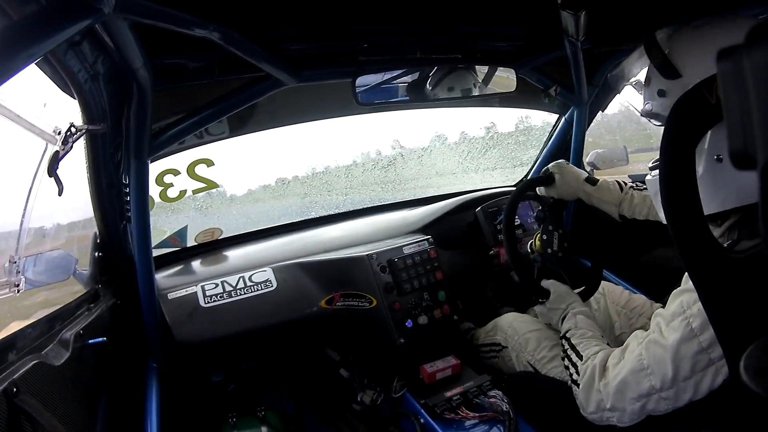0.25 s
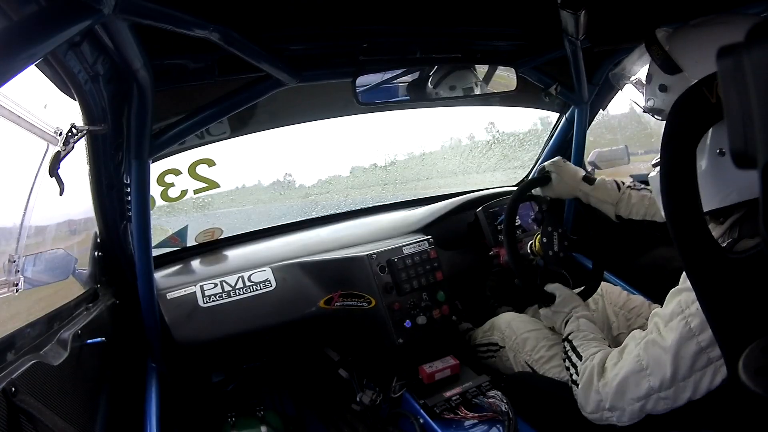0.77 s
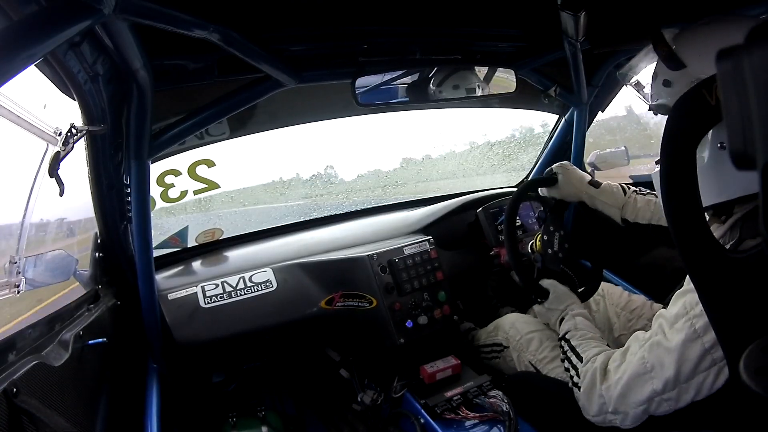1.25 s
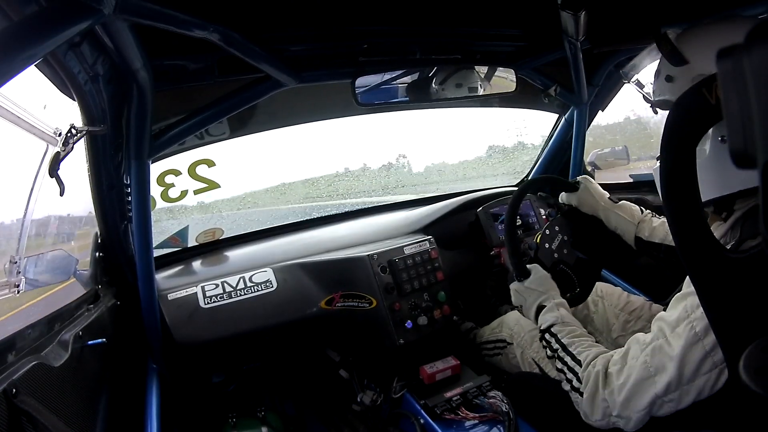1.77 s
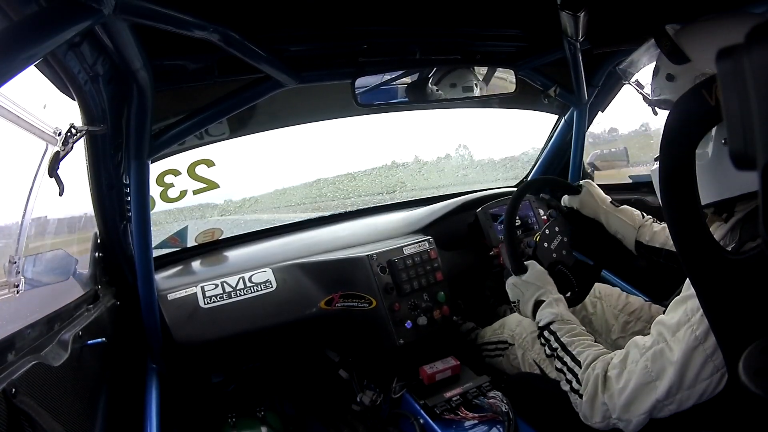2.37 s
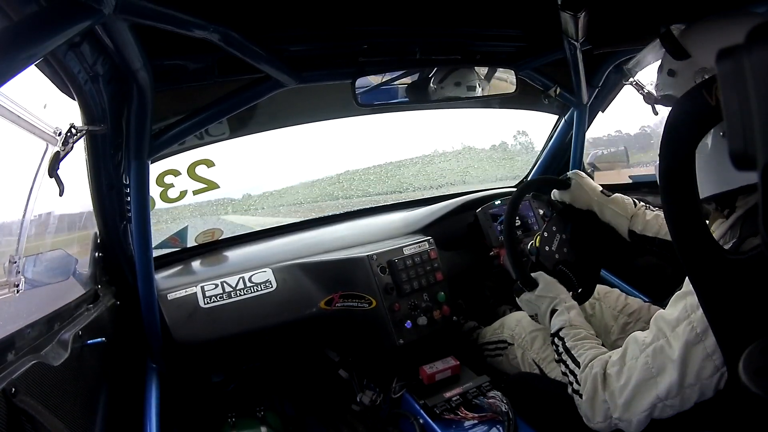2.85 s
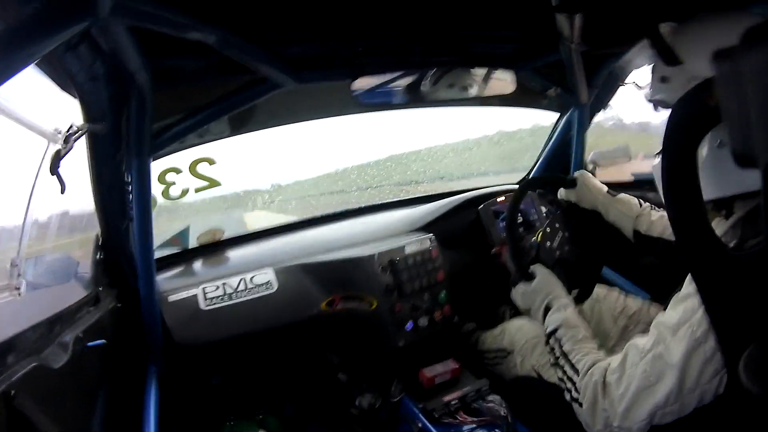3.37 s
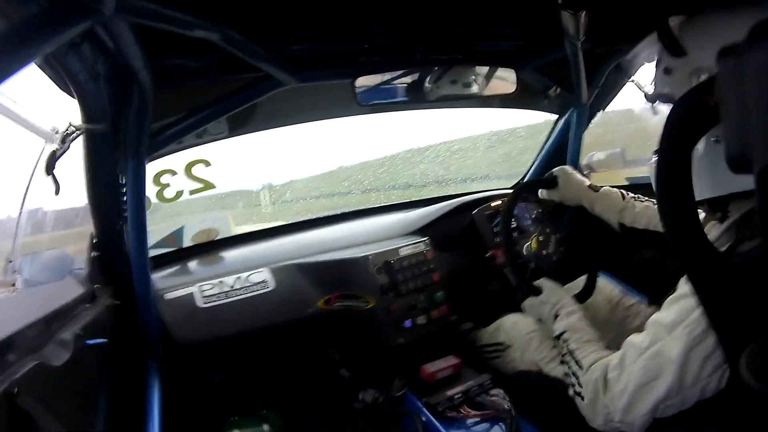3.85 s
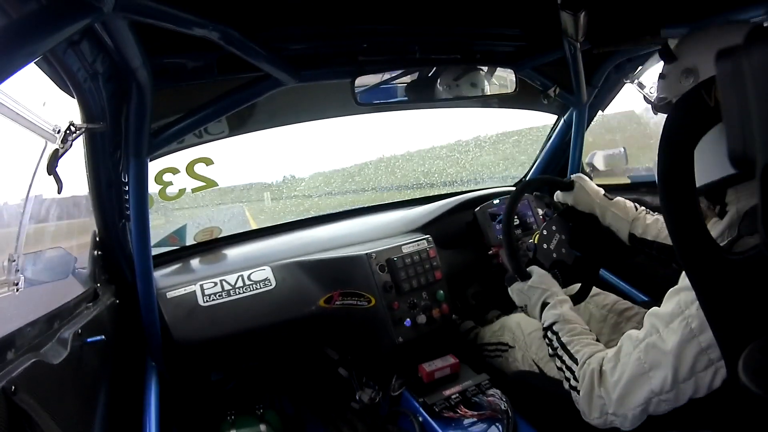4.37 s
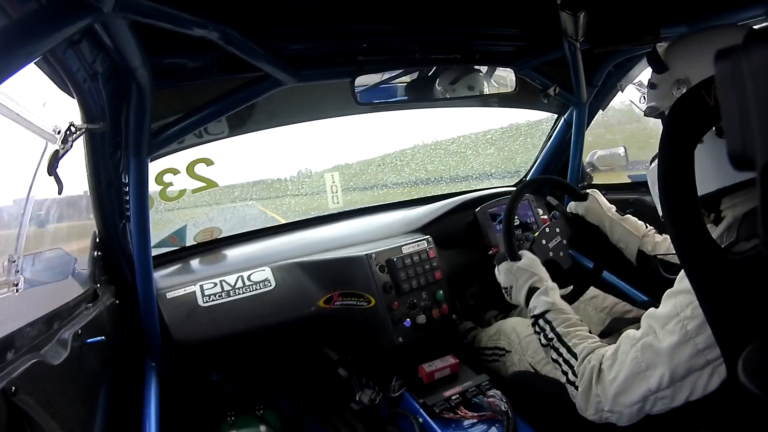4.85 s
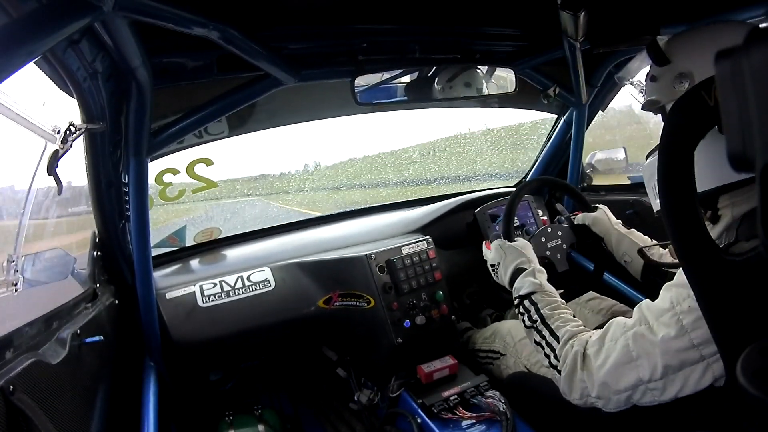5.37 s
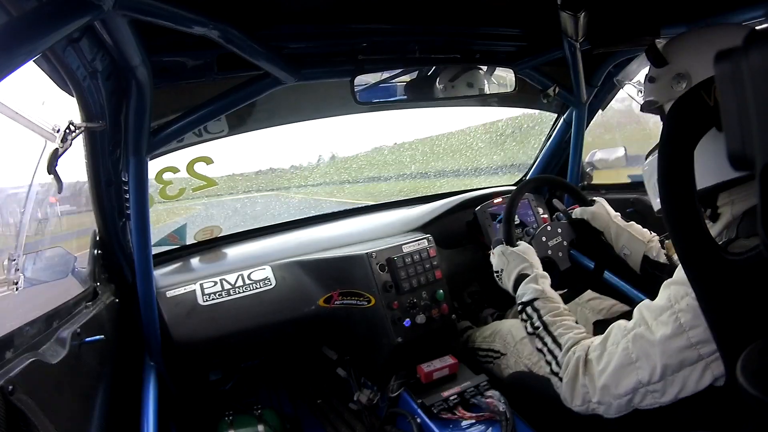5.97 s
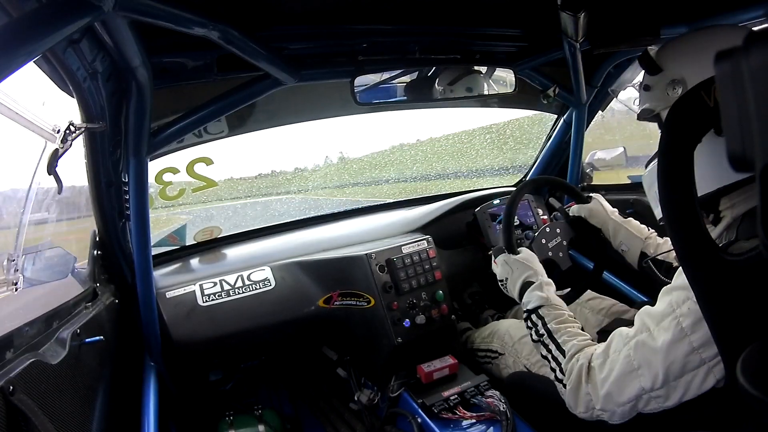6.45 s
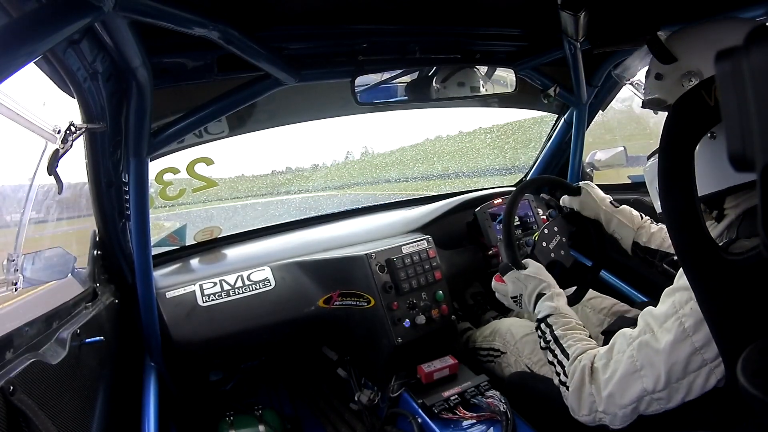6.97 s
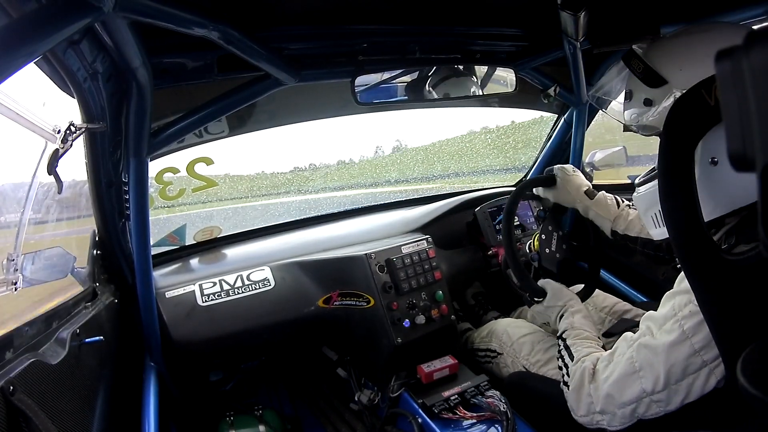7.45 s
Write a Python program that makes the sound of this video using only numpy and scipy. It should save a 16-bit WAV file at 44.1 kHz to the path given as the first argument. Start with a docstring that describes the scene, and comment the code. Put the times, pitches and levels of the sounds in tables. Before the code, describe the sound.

A microphone inside a stripped race car cabin catches a six-cylinder turbo engine. From 0 s it drones fairly muted, then by about 0.9 s boost builds into a loud, hard, resonant rasp that climbs slowly in one gear until 3.3 s, with little rev flutters over bumps, drive shaft hum and deep road rumble. From 3.2 to 4.8 s, strongest at 3.4-4.3, kerb ridges pound in rapid, buzzing low thuds with suspension knocks and high metal ticks, overloading the microphone and choking the engine. The throttle shuts around 4 s; one harsh snap cracks at 4.3. Under braking the dull, gassy coasting note sinks, interrupted by downshifts near 4.85, 5.4, 6.0 and 6.85 s, each jumping revs upward, with small barks and gearbox clatter. Brief whine follows the last two; the engine keeps slowing until 7.7 s.

```python
"""Race car over a kerb and down the gears

Inside the car a six-cylinder turbo engine pulls hard, hammers over a kerb, then brakes through four downshifts.
Engine: low-order sines, plus firing orders, clicks and gated gas noise coloured by exhaust and panels.
The drive shaft hums as two sines that follow road speed; the road rumbles as coloured noise.
Kerb ridges thud as phase-wavering sines; ticks and knocks are struck modes, clatter is bursts of grains.
The kerb overloads the microphone, which flattens big swings."""
import sys
import numpy as np
from scipy import signal
from scipy.fft import rfft, irfft, next_fast_len
from scipy.io import wavfile
from scipy.ndimage import uniform_filter1d

SR = 44100
rng = np.random.default_rng(int(sys.argv[2]) if len(sys.argv) > 2 else 0)


def attenuation_scalar(level_db):
    """Turn a level in dB into a linear amplitude multiplier (20 dB per decade)."""
    decades = np.asarray(level_db, float) / 20
    return 10 ** decades


def dump(signal):
    """Clip the signal to [-1, 1] and save it as 16-bit WAV at the path in sys.argv[1]."""
    limited = np.clip(np.atleast_2d(signal).T, -1, 1)
    pcm = np.round(limited * 32767).astype(np.int16)
    wavfile.write(sys.argv[1], SR, pcm)


N = 340444

# road speed as drive shaft turning speed: time_s, shaft_hz, hum_db
SPEED = [(0, 99.08, -47), (.47, 100.3, -32), (.84, 102.1, -28), (1.34, 104.5, -28.5), (1.83, 109.8, -29),
         (2.25, 113.8, -28.5), (2.55, 117.7, -23.5), (2.86, 120.2, -26.5), (3.3, 127.7, -29),
         (3.6, 130.3, -16), (3.95, 127.2, -21), (4.15, 128.4, -18), (4.27, 125.8, -14.5),
         (4.305, 124.8, -30), (4.36, 123.4, -8), (4.44, 122.8, -21), (4.68, 120, -22.5), (5.08, 106.5, -25),
         (5.4, 99.17, -39.5), (5.8, 94.78, -28.5), (6.0, 89.7, -33.5), (6.34, 81.72, -25.5),
         (6.7, 74.33, -49), (7.05, 69.23, -32), (7.15, 67.03, -50), (7.26, 66.83, -27.5),
         (7.38, 64.79, -50.5), (7.72, 61.53, -40)]
# cabin panel resonances: centre_hz, width_hz, lift_db
PANELS = [(537.7, 27.6, 10), (546, 35, -2), (600.7, 41, 8), (684, 30, 5), (726, 41, -0.5), (837, 11, 0),
          (891.4, 37, -4.5), (1015.7, 21, 4), (1157.3, 51, 5.5), (1306.9, 35.5, 10), (1345.6, 20, -6),
          (1415, 42.3, 8.5), (1591.5, 27, 6), (1950, 7.5, 0), (2096.5, 25, 4.5), (2542, 44, 4),
          (3370, 210, 4.5), (3724, 60, 6), (4152, 150, 6.5), (4464, 110, 9.5)]
# broad high panel resonances with the throttle shut: centre_hz, width_hz, lift_db
HIGH_PANELS_SHUT = [(3450, 200, 2.5), (4236, 260, 5), (4560, 120, 4.5)]


def curve(rows):
    """Interpolate each table column over time_s, sample by sample."""
    time_s, *columns = np.transpose(rows)
    return [np.interp(np.arange(N) / SR, time_s, column) for column in columns]


def ramp(start_s, takes_s):
    """Rise from 0 to 1 over a span."""
    return np.clip((np.arange(N) / SR - start_s) / takes_s, 0, 1)


def hump(peak_s, half_width_s):
    """Triangle up to 1 and down again."""
    return np.maximum(1 - abs(np.arange(N) / SR - peak_s) / half_width_s, 0)


def unit(x):
    """Scale to rms 1."""
    return x / np.sqrt(np.mean(x ** 2) + 1e-20)


def drift(rate_hz):
    """Slow random signal of rms 1: noise through a double pole, made at every 40th sample."""
    pole = np.exp(-80 * np.pi * rate_hz / SR)
    noise = rng.standard_normal(N // 40 + 2002)
    slow = signal.lfilter([1], [1, -2 * pole, pole * pole], noise)[2000:]
    return np.interp(np.arange(N) / 40, np.arange(len(slow)), unit(slow))


def colour(x, spectrum, panels=()):
    """Filter x by a gain curve over log frequency, lifted at the panel resonances."""
    size = next_fast_len(N + 4096)
    hz = np.arange(size // 2 + 1) * SR / size + 1e-3
    points_hz, points_db = np.transpose(spectrum)
    gain_db = np.interp(np.log(hz), np.log(points_hz), points_db, left=-120, right=-120)
    for centre_hz, width_hz, lift_db in panels:
        gain_db = gain_db + lift_db / (1 + (2 * (hz - centre_hz) / width_hz) ** 2)
    return irfft(rfft(x, size) * attenuation_scalar(gain_db), size)[:N]


def tone(turns, rms_db, waver_rad):
    """Sine of a given rms whose phase wavers slowly."""
    return np.sqrt(2) * attenuation_scalar(rms_db) * np.sin(2 * np.pi * turns + waver_rad * drift(6.03))


def ring(clicks, hz, t60_s):
    """Two-pole resonator: a unit click starts a decaying sine of height 1."""
    r, w = attenuation_scalar(-60 / (t60_s * SR)), 2 * np.pi * hz / SR
    return signal.lfilter([0, np.sin(w)], [1, -2 * r * np.cos(w), r * r], clicks + 1e-18)


def gearbox():
    """Engine speed is shaft speed times gear ratio, plus flares; also clutch-out and clutch-bite curves."""
    # clutch_out_s, take_up_s, engine_cycles_per_shaft_turn
    downshifts = [(4.84, 0.083, 0.5936), (5.4, 0.2182, 0.649), (6.0, .08, .77), (6.84, 0.0971, 0.972)]
    # revs flare as wheels slip over bumps or the clutch bites: peak_s, rise_cycles_hz, half_width_s
    flares = [(0.949, 2.37, 0.109), (1.251, 1.131, 0.0918), (1.59, 1.007, 0.0744), (1.748, 1.129, 0.0779),
              (2.78, 2.69, 0.0822), (3.203, 0.68, 0.072), (3.361, 3.06, 0.076), (3.749, 1.836, 0.138),
              (3.898, 2.688, 0.31), (4.932, 1.9, .12), (5.649, 1.988, 0.1099), (6.07, 5.05, 0.0738),
              (6.2, 2, 0.0897), (6.516, 2.627, 0.1487)]
    top_gear, bite_settles_s = .557, .18
    ratio, last_gear = top_gear, top_gear
    declutched, bite = np.zeros(N), np.zeros(N)
    for start_s, takes_s, gear in downshifts:
        ratio = ratio + (gear - last_gear) * ramp(start_s, takes_s)
        last_gear = gear
        declutched += hump(start_s + takes_s / 4, max(takes_s / 2, .05))
        bite += ramp(start_s + takes_s / 2, takes_s / 2) - ramp(start_s + takes_s, bite_settles_s)
    flare_hz = sum(rise_hz * hump(peak_s, half_s) for peak_s, rise_hz, half_s in flares)
    cycles_hz = curve(SPEED)[0] * ratio + flare_hz
    return cycles_hz, flare_hz, declutched, bite


def low_tones(cycles, cycles_hz, throttle, declutched, bite):
    """Sines of the crankshaft, one bank and all firings, boosted where the cabin booms."""
    # order_per_cycle, load_db, coast_db, clutch_out_change_db, waver_rad
    low_orders = [(2, -29.5, -31, 1, 0.42), (3, -28, -31, -18.5, 0.11), (6, -29, -56, 14, 0.53)]
    # swell of the first two tones while coasting: time_s, crankshaft_db, bank_db
    coast_swells = [(4.4, 1, 0), (5.0, 6.5, 1), (5.4, 1, 0), (5.7, -4.5, -2.5), (5.95, 1, 1),
                    (6.15, -1.5, 3.5), (6.5, -5, 1), (6.65, 4, -3.5), (6.85, 7, 1.5), (6.95, 0, 3.5),
                    (7.44, -2, 1.5), (7.52, -9.5, -6), (7.72, 5.5, -1.5)]
    # cabin boom: pitch_hz, gain_db
    boom = [(105, -15.5), (113, -4), (118, 1), (123, -4.5), (128, -13), (142, 1.5), (164, -3.5), (176, 0.5),
            (183, -2.5), (190, -2.5), (197, -2.5), (215, -2.5), (330, -2.5), (362, 2), (393, 4.5),
            (415, -1), (432, -12)]
    bite_db = 4.5
    out = np.zeros(N)
    for row, swell_db in zip(low_orders, [*curve(coast_swells), 0]):
        order, load_db, coast_db, clutch_out_db, waver_rad = row
        order = round(order)
        coasting_db = coast_db + swell_db
        level_db = coasting_db + throttle * (load_db - coasting_db)
        level_db = level_db + clutch_out_db * declutched + bite_db * bite
        level_db = level_db + np.interp(order * cycles_hz, *np.transpose(boom))
        out += tone(order * cycles + 3 / 4, level_db, waver_rad)
    return out


def gear_whine(cycles):
    """After the last two downshifts a sine at 24 per engine cycle swells and dies away."""
    # peak_s, peak_rms_db, rise_s, fall_10_db_s
    whines = [(6.17, -46.5, .04, 0.03), (7.07, -43, 0.052, 0.35)]
    out = np.zeros(N)
    for peak_s, peak_db, rise_s, fall_s in whines:
        since_s = np.maximum(np.arange(N) / SR - peak_s, 0)
        fading_db = peak_db - 10 * since_s / fall_s
        out += ramp(peak_s - rise_s, rise_s) * tone(24 * cycles, fading_db, waver_rad=.7)
    return out


def firings(cycles, throttle, jitter_gaps, spread_db):
    """One click per firing, sized and timed by its cylinder and split between two samples."""
    # cylinders in firing order: load_db, coast_db, late_firing_gaps
    cylinders = [(-13, 8.5, 0.0061), (-19, 15, 0.11), (-13, 9.5, -0.0466), (-8, 11.5, 0.0082),
                 (-2, 15.5, 0.1006), (-7, 12, -0.0222)]
    count = np.arange(1, int(6 * cycles[-1]) - 1)
    load_db, coast_db, late_gaps = np.transpose(cylinders)[:, count % 6]
    chance = rng.standard_normal((len(count), 2))
    at = np.interp(count + late_gaps + jitter_gaps * chance[:, 0], 6 * cycles, np.arange(N))
    first = np.minimum(at.astype(int), N - 2)
    size = attenuation_scalar(coast_db + throttle[first] * (load_db - coast_db) + spread_db * chance[:, 1])
    clicks = np.zeros(N)
    np.add.at(clicks, first, size * (1 - at % 1))
    np.add.at(clicks, first + 1, size * (at % 1))
    return unit(clicks - clicks.mean())


def orders(cycles, throttle, waver_turns, swell_db):
    """Repeating pressure wave of the cycle: orders share a timing waver, each swells on its own."""
    # orders of the four-stroke cycle, one row each from the fourth up: load_db, coast_db
    order_levels = [(-38.5, -24), (-27.5, -19.5), (-45.5, -24.5), (-30, -38.5), (-26, -24), (-21.5, -29),
                    (-32, -28), (-28, -30.5), (-17, -24), (-22, -33.5), (-21, -26.5), (-17, -30),
                    (-28.5, -36.5), (-32.5, -39.5), (-26, -35.5), (-31.5, -42), (-26.5, -26.5),
                    (-24.5, -37), (-29.5, -34), (-33.5, -39), (-55.5, -29), (-53.5, -31.5), (-28.5, -29.5),
                    (-30, -31.5)]
    # high orders that stand out of the rasp, rounded below: order_per_cycle, load_db
    rasp = [(28, -28), (29, -32), (32, -27.5), (33, -33), (34, -27), (35, -27.5), (37, -31.5), (39, -33),
            (40, -27.5), (41, -27.5), (44, -37), (46, -29.5), (47, -36), (48, -31), (42, -32), (51, -32),
            (54, -30), (57, -32), (60, -30.5), (62.96, -31.5), (65.86, -31.5), (68.77, -32.5), (72.13, -32),
            (75.03, -31.5), (77.83, -33)]
    # how loosely the orders gather into one suction pulse per cycle: time_s, scatter_turns
    punch_spread = [(0, .34), (.4, .3), (.55, .2), (1.0, .24), (1.2, .12), (1.55, .1), (1.75, .2),
                    (7.72, .18)]
    rasp_coast_change_db, waver_rad_per_order = -9, .014
    out, turns = np.zeros(N), cycles + waver_turns * drift(4.4)
    scatter_turns, = curve(punch_spread)
    rows = [(k, *levels_db) for k, levels_db in enumerate(order_levels, 4)]
    rows += [(round(k), load_db, load_db + rasp_coast_change_db) for k, load_db in rasp]
    for k, load_db, coast_db in rows:
        level_db = coast_db + throttle * (load_db - coast_db) + swell_db * drift(8.28)
        # orders above 30 waver more the higher they are
        rough_turns = waver_rad_per_order * max(k - 30, 0) * drift(30.) / (2 * np.pi)
        offset_turns = 3 / 4 + scatter_turns * rng.uniform(-1.484, 1)
        out += tone(k * turns + rough_turns + offset_turns, level_db, waver_rad=.582)
    return out


def gas_noise(cycles):
    """Exhaust gas as noise that throbs with the engine cycle and its first overtones."""
    # once-per-cycle throb: time_s, depth_0_to_1
    chug = [(0, 0), (1.0, 0.06), (1.2, 0.08), (1.55, 0.45), (1.8, 0), (3.3, 0), (4.2, 0.02)]
    depth = np.clip(curve(chug)[0], 0, 1)
    gate = 1 + depth * np.cos(2 * np.pi * (cycles - .1))
    gate = gate + .077 * np.cos(4 * np.pi * cycles) + .043 * np.cos(6 * np.pi * cycles)
    return unit(gate * attenuation_scalar(.19 * drift(25.)) * rng.standard_normal(N))


def engine():
    """Low tones and whine, plus pulses and gas noise coloured by the exhaust and the panels."""
    # before flares and barks: time_s, exhaust_drone_db, bright_bark_db
    load = [(0, -39, -39), (.13, -38.5, -39.5), (.72, -33.5, -33), (.88, -29, -29), (1.3, -28, -27),
            (1.8, -28, -24.5), (2.0, -34.5, -21.5), (2.32, -28.5, -23), (2.95, -29.5, -21),
            (3.27, -37, -21), (3.6, -30, -25), (3.95, -38.5, -28), (4.05, -31, -41.5), (4.3, -38, -42.5),
            (4.5, -40, -42.5), (5.4, -36.5, -45.5), (6.17, -36, -43.5), (6.75, -37.5, -47.5),
            (7.05, -34.5, -43), (7.72, -35, -46.5)]
    # short barks: peak_s, drone_lift_db, bark_lift_db, half_width_s
    blips = [(4.329, 3, 10.5, 0.019), (4.67, 3, 8, 0.0562), (5.46, 1, 7, .05), (6.06, 5.5, 4, 0.073),
             (6.825, 8.5, 6, 0.031), (6.9, 5.5, 7.5, 0.077)]
    # power share of pulses against gas noise, clutch in: time_s, share_0_to_1
    clean_share = [(0, .68), (.5, .75), (.9, .9), (3.26, .9), (3.4, .6), (3.95, .4), (4.15, .15),
                   (4.5, .35), (5.0, .4), (5.15, .62), (6.8, .62), (7.05, .78), (7.72, .78)]
    # drone colour, throttle shut then open: pitch_hz, gain_db
    drone_spectra = [
        [(140, -19.5), (230, -1.5), (442, -2), (528, -6.5), (745, -1), (824, -19.5), (950, -11.5),
         (1240, -34.5), (2090, -120)],
        [(140, -33.5), (230, -1), (338, -10), (381, -2), (450, -5.5), (544, -7.5), (950, -17), (1240, -21),
         (2090, -120)],
    ]
    # bark colour, throttle shut then open: pitch_hz, gain_db
    bark_spectra = [
        [(500, -34.5), (850, -0.5), (1180, -6), (1450, -1), (3080, -16), (4330, -17.5), (5800, -24),
         (8050, -29.5), (11300, -55.5), (12600, -60.5), (15500, -74)],
        [(500, -42), (850, -16), (1010, -13.5), (1100, -16), (1330, -3.5), (1520, -6), (1990, -13), (3930, -12),
         (4380, -12), (5200, -12.5), (7200, -18), (8050, -18.5), (8600, -29), (10000, -36), (15500, -47.5)],
    ]
    drone_flare_db_per_hz, clean_declutched = .47, .15
    boost_at_first, boost_from_s, boost_builds_s = .157, .15, .702
    ease_from_s, ease_takes_s, ease_share = 2.877, .542, .526

    cycles_hz, flare_hz, declutched, bite = gearbox()
    cycles = np.cumsum(cycles_hz) / SR
    throttle = 1 - ramp(3.95, .2)
    drone_db, bark_db = curve(load)
    drone_db = drone_db + drone_flare_db_per_hz * flare_hz
    for peak_s, drone_lift_db, bark_lift_db, half_s in blips:
        drone_db = drone_db + drone_lift_db * hump(peak_s, half_s)
        bark_db = bark_db + bark_lift_db * hump(peak_s, half_s)

    out = low_tones(cycles, cycles_hz, throttle, declutched, bite) + gear_whine(cycles)
    clicks = firings(cycles, throttle, jitter_gaps=.003, spread_db=.9)
    click_band = signal.butter(3, [1750, 5000], "band", fs=SR, output="sos")
    pulses = (.35 + .65 * throttle) * signal.sosfilt(click_band, clicks)
    pulses = pulses + orders(cycles, throttle, waver_turns=.0012, swell_db=1.6)
    clean = curve(clean_share)[0]
    clean = clean + declutched * (clean_declutched - clean)
    blow = np.sqrt(clean) * pulses + np.sqrt(1 - clean) * gas_noise(cycles)

    # boost builds, then the throttle is feathered over the kerb
    boost = throttle * (boost_at_first + (1 - boost_at_first) * ramp(boost_from_s, boost_builds_s))
    boost = boost * (1 - ease_share * ramp(ease_from_s, ease_takes_s))
    for (shut, wide), level_db in (drone_spectra, drone_db), (bark_spectra, bark_db):
        shut_part = unit(colour(blow, shut, PANELS[:15] + HIGH_PANELS_SHUT))
        wide_part = unit(colour(blow, wide, PANELS))
        part = (1 - boost) * shut_part + boost * wide_part
        # even out the running rms so level_db alone sets the loudness
        evened = part / np.sqrt(uniform_filter1d(part ** 2, size=8000) + 1e-20)
        out = out + attenuation_scalar(level_db) * evened
    return out


def shaft():
    """The drive shaft hums at its turning speed and the octave, throbbing under first braking."""
    throb_from_s, throb_to_s, throb_hz, throb_db, octave_db = 4.27, 4.82, 4.884, 4.5, -22.5
    shaft_hz, hum_db = curve(SPEED)
    braking = ramp(throb_from_s - .1, .062) - ramp(throb_to_s, .0759)
    throb = np.cos(2 * np.pi * throb_hz * (np.arange(N) / SR - throb_from_s))
    hum_db = hum_db + throb_db * braking * throb
    turns = np.cumsum(shaft_hz) / SR
    hum = tone(turns, hum_db + 2.08 * drift(4.2), waver_rad=.31)
    octave = tone(2 * turns, hum_db + octave_db + 4 * drift(6.7), waver_rad=.43)
    return hum + octave


def road():
    """Tyre and body rumble: coloured noise of drifting level."""
    # time_s, rumble_db
    road_level = [(0, -28), (.94, -30.5), (1.2, -27), (2.7, -25.5), (3.05, -21.5), (3.3, -21.5),
                  (3.45, -11), (3.85, -13.5), (4.6, -22.5), (4.8, -18), (5.05, -20.5), (5.4, -23.5),
                  (6.3, -24.5), (7.05, -26.5), (7.3, -26), (7.72, -29.5)]
    # pitch_hz, gain_db
    rumble_spectrum = [(12, -28), (20, 11.5), (60, 4), (113, 0), (150, -8), (184, -6.5), (252, -14),
                       (330, -18), (430, -29), (730, -120)]
    rumble = unit(colour(rng.standard_normal(N), rumble_spectrum))
    return attenuation_scalar(curve(road_level)[0] + 2.0 * drift(3.24)) * rumble


def kerb():
    """Uneven thuds, one per ridge; the body heaves below them and the suspension knocks above."""
    # strips of ridges under the wheels: start_s, end_s, ridge_hz, thud_db, fade_in_s
    strips = [(3.2, 3.556, 85.74, -10, 0.255), (3.6, 4.053, 64.91, -11, 0.11),
              (4.028, 4.317, 81.48, -18, 0.052), (4.324, 4.43, 81.28, -15.5, 0.037),
              (4.463, 4.768, 88.46, -24.5, .06)]
    fade_out_s = .0636
    level, hz = np.zeros(N), np.zeros(N)
    for start_s, end_s, ridge_hz, thud_db, fade_in_s in strips:
        level += attenuation_scalar(thud_db) * (ramp(start_s, fade_in_s) - ramp(end_s - fade_out_s, fade_out_s))
        hz[int(start_s * SR):] = ridge_hz
    phase = 2 * np.pi * np.cumsum(hz) / SR + .464 * drift(8.3)
    wave = np.sin(phase) + .179 * np.sin(2 * phase + drift(26.0))
    thuds = np.sqrt(2) * attenuation_scalar(2.585 * drift(45.)) * wave
    heave_band = signal.butter(2, [15, 50], "band", fs=SR, output="sos")
    heave = unit(signal.sosfilt(heave_band, rng.standard_normal(N)))
    # random blows, about 110 per second
    blows = rng.standard_normal(N) * (rng.random(N) < 110 / SR) + 1e-18
    knock_band = signal.butter(2, [150, 400], "band", fs=SR, output="sos")
    knocks = unit(signal.sosfilt(knock_band, blows))
    return level * (thuds + .261 * heave + .207 * knocks)


def strike(events, modes, soft_hz):
    """Blows ring a part's short modes with random strengths; soft contact dulls them by a low-pass."""
    at_s, blow_db = np.transpose(events)
    out, chance = np.zeros(N), rng.standard_normal((len(at_s), len(modes)))
    for (mode_hz, mode_db, t60_s), own in zip(modes, chance.T):
        clicks = np.zeros(N)
        clicks[(at_s * SR).astype(int)] = attenuation_scalar(blow_db + mode_db + 2.0 * own)
        out += ring(clicks, mode_hz, t60_s)
    return signal.sosfilt(signal.butter(2, soft_hz, fs=SR, output="sos"), out)


def suspension_knocks():
    """The suspension bottoms out on the kerb and rings low modes."""
    # start_s, blow_db
    knock_events = [(3.446, -12), (3.508, -24.5), (3.532, -18.5), (3.612, -25.5), (3.675, -17),
                    (3.752, -25.5), (3.848, -19.5), (3.939, -14), (4.0, -13.5), (4.033, -26), (4.093, -19),
                    (4.123, -17), (4.169, -16.5), (4.201, -15), (4.224, -22), (4.262, -19.5)]
    # mode_hz, mode_db, t60_s
    knock_modes = [(275, 1, 0.051), (369, 1, 0.025), (494, -5.5, 0.027)]
    return strike(knock_events, knock_modes, soft_hz=704)


def metal_ticks():
    """A loose metal part, shaken by the kerb, rings short high modes."""
    # start_s, blow_db
    tick_events = [(3.427, -25.5), (3.494, -20), (3.547, -31), (3.634, -21), (3.675, -16.5), (3.707, -20),
                   (3.878, -19.5), (3.956, -27.5), (3.9635, -23.5), (3.971, -19), (4.001, -28),
                   (4.018, -18), (4.026, -23), (4.033, -31.5), (4.048, -19), (4.055, -26), (4.063, -17),
                   (4.074, -28.5), (4.085, -17.5), (4.096, -22.5), (4.1035, -12.5), (4.110, -20),
                   (4.156, -22.5), (6.395, -39.5)]
    # mode_hz, mode_db, t60_s
    tick_modes = [(2600, -14.5, .004), (3500, -3.5, 0.0069), (4070, -0.5, .006), (4870, -11.5, .004),
                  (6440, -21, .003), (7940, -23, .003)]
    return strike(tick_events, tick_modes, soft_hz=6000)


def bursts(events, rise_s):
    """Envelope that jumps up at each event and dies over its length, at least 2 ms."""
    t, out = np.arange(N) / SR, np.zeros(N)
    for start_s, level_db, length_s in events:
        since_s = np.maximum(t - start_s, 0)
        fall = np.exp(-(since_s / max(length_s, .002)) ** 3)
        out += attenuation_scalar(level_db) * np.minimum(since_s / rise_s, 1) * fall
    return out


def clatter():
    """Gearbox and exhaust clatter: bursts of dense metal grains, with clicks that ring the casing."""
    # start_s, burst_db, length_s, casing_blow_db
    clatter_events = [(4.0243, -36, 0.019, -27.5), (4.058, -33, 0.0656, -31), (4.082, -20.5, 0.0044, -40.5),
                      (4.096, -24.5, 0.008, -44.5), (4.16, -31.5, 0.004605, -49.5),
                      (4.2, -29, 0.0049, -53.5), (4.217, -36, 0.0036, -50), (4.376, -36, 0.0348, -39.5),
                      (4.41, -40.5, 0.0625, -44), (4.65, -42.5, 0.0231, -34), (5.402, -42.5, 0.013, -52.5),
                      (5.421, -33.5, 0.0286, -55), (5.51, -41, 0.058, -38), (5.985, -41.5, 0.00964, -44.5),
                      (6.022, -32.5, 0.00726, -39.5), (6.049, -33, 0.0352, -40.5),
                      (6.389, -47, 0.0339, -48.5), (6.514, -47.5, 0.0097, -55.5), (6.805, -40, 0.0167, -46),
                      (6.9019, -38.5, 0.022, -44.5)]
    # pitch_hz, gain_db
    grain_spectrum = [(500, -40), (900, -9), (1400, -1.5), (2000, -11.5), (3000, -13.5), (4300, -10.5),
                      (5300, -18), (7500, -24.5), (9500, -41), (15500, -42)]
    # gearbox casing: mode_hz, t60_s
    casing_modes = [(655, 0.59)]
    grain_size = attenuation_scalar(2.8 * np.minimum(rng.exponential(1, N), 3))
    grains = rng.standard_normal(N) * grain_size * (rng.random(N) < 6000 / SR)
    rows = np.array(clatter_events)
    metal = unit(colour(grains, grain_spectrum, PANELS[:15] + HIGH_PANELS_SHUT))
    out = bursts(rows[:, :3], rise_s=.0034) * metal
    blows = np.zeros(N)
    blows[(rows[:, 0] * SR).astype(int)] = attenuation_scalar(rows[:, 3])
    for mode_hz, t60_s in casing_modes:
        out += signal.lfilter([.1], [1, -.99], ring(blows, mode_hz, t60_s))  # low-pass
    return out


def snap():
    """A loose part rattles hard by the microphone and bounces: coloured spikes of one sign."""
    # start_s, burst_db, length_s
    snap_events = [(4.3112, -15, 0.00487), (4.3255, -40, 0.0025)]
    # pitch_hz, gain_db
    crack_spectrum = [(100, -26), (300, 15), (1000, -2.5), (1490, 5.5), (2200, -9.5), (4190, 4.5),
                      (5830, -8.5), (6740, -11), (7670, -4.5), (8600, -11), (15300, -27.5), (15700, -67)]
    spikes = (rng.random(N) < 4000 / SR) * rng.uniform(.35, 1, N)
    return bursts(snap_events, rise_s=.0002) * unit(colour(spikes, crack_spectrum))


def scene():
    """All sources at the one microphone."""
    car = engine() + shaft() + road() + kerb()
    parts = suspension_knocks() + metal_ticks() + clatter() + snap()
    return (car + parts)[None]


def band_limit(x):
    """A steep low-pass at the top of the band."""
    return signal.sosfilt(signal.butter(12, 15670, fs=SR, output="sos"), x)


def record(dry):
    """The capsule flattens big swings, muting what rides on them; low cut, lopsided amplifier, ceiling."""
    overload, low_cut_hz, lopsided_per_full_scale, ceiling = .411, 73.7, .45, .554
    flat = overload * dry / (overload ** 10 + dry ** 10) ** (1 / 10)
    cut = signal.sosfilt(signal.butter(2, low_cut_hz, "high", fs=SR, output="sos"), flat)
    # more gain on pushes than on pulls, less the running mean
    bent = cut + lopsided_per_full_scale * (cut ** 2 - uniform_filter1d(cut ** 2, size=2000))
    return band_limit(np.clip(bent, -ceiling, ceiling))


dry = scene()
out = record(dry)
dump(out)
```